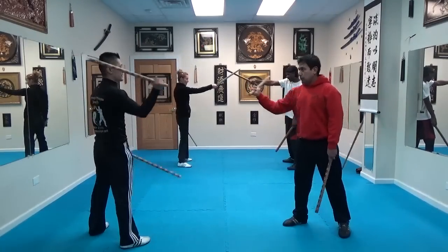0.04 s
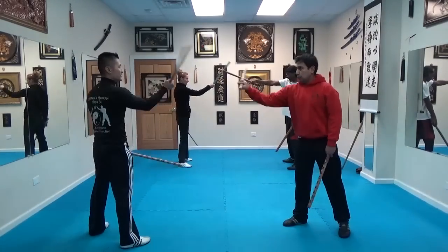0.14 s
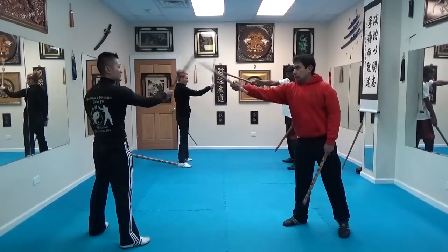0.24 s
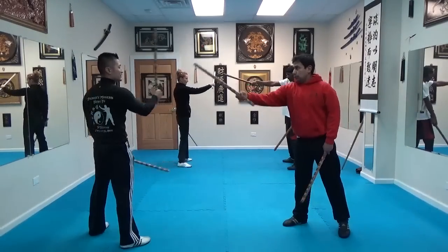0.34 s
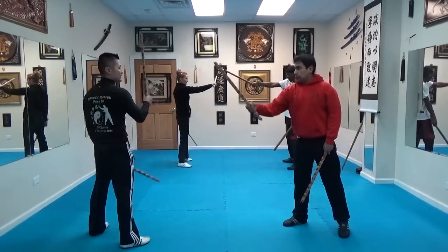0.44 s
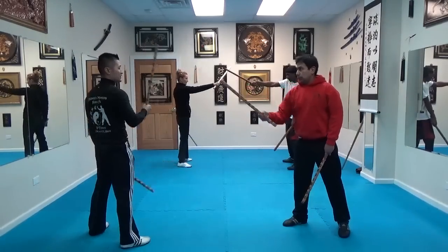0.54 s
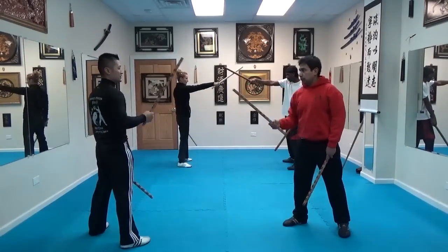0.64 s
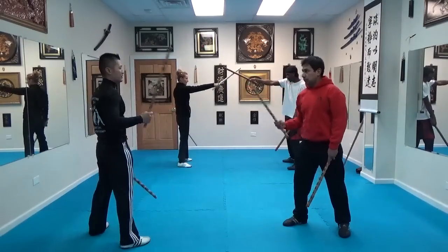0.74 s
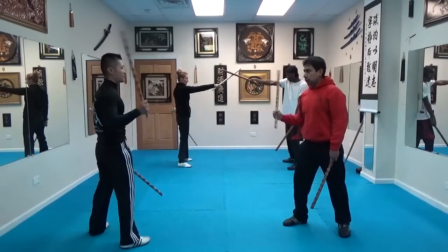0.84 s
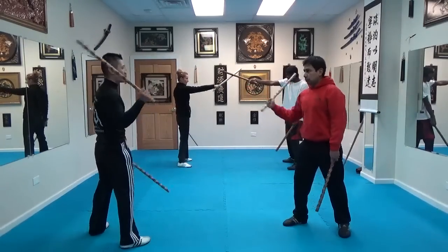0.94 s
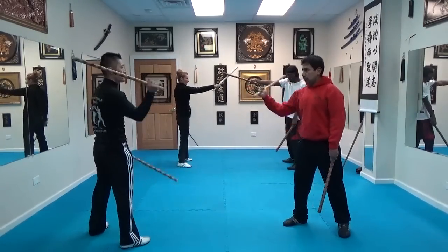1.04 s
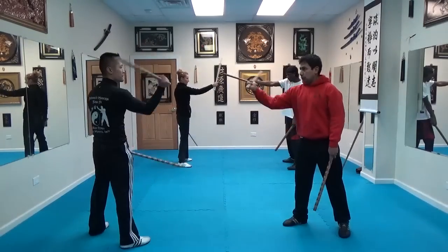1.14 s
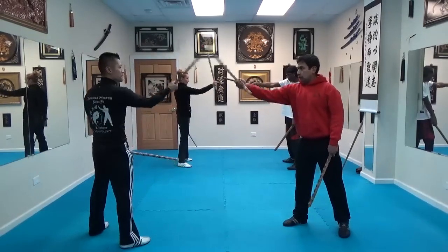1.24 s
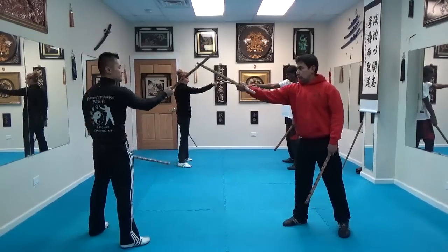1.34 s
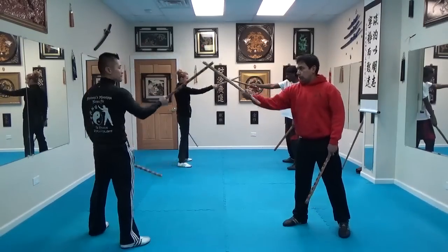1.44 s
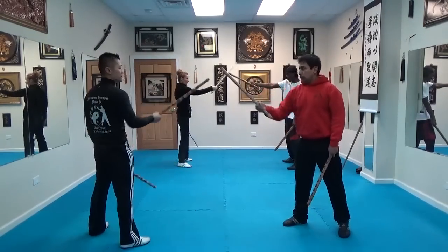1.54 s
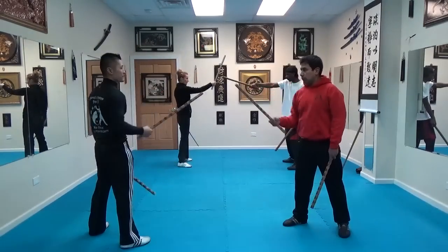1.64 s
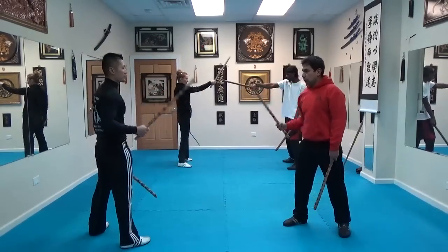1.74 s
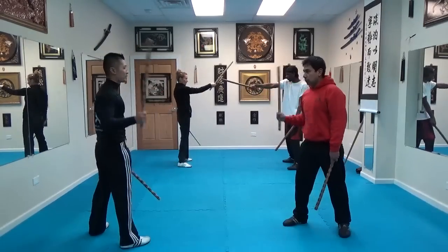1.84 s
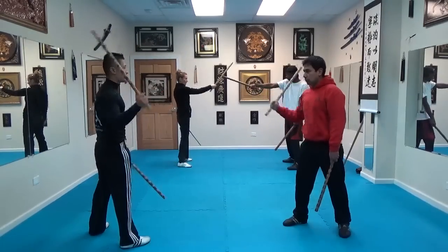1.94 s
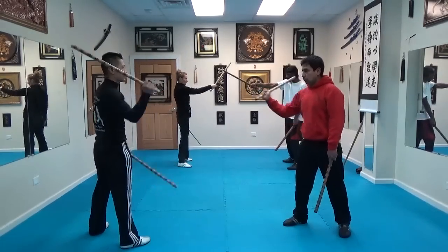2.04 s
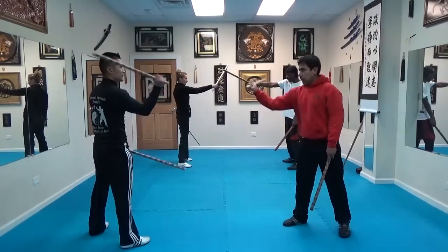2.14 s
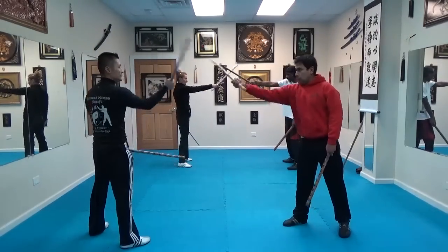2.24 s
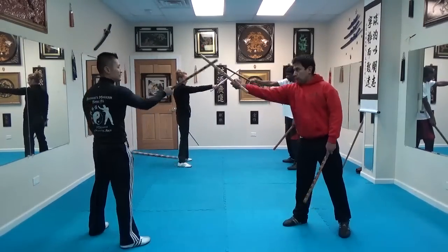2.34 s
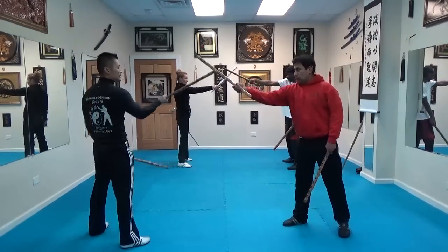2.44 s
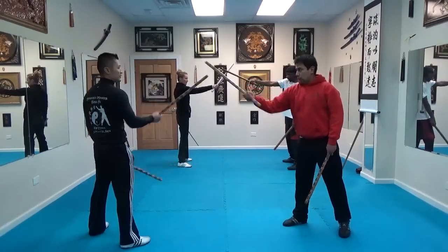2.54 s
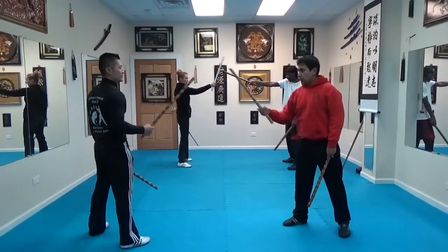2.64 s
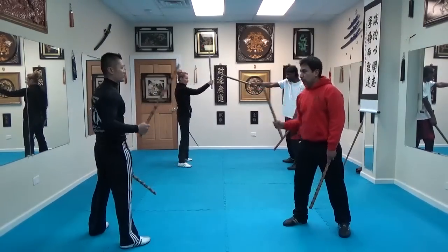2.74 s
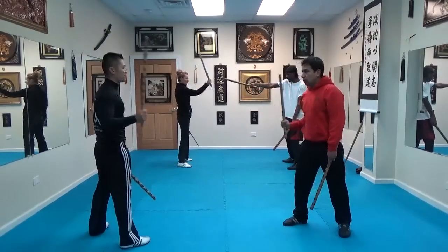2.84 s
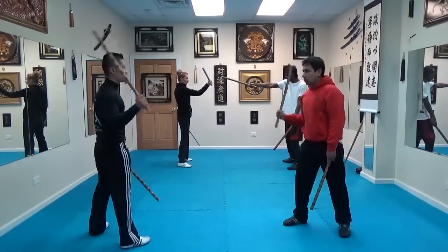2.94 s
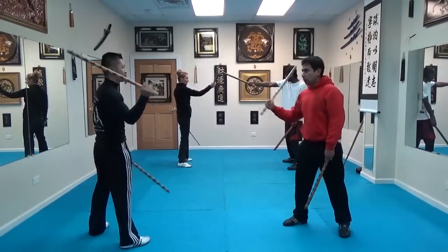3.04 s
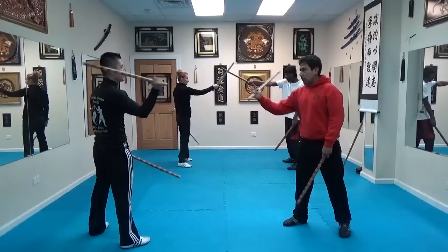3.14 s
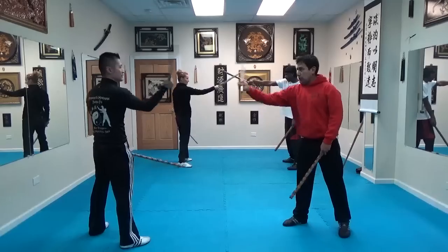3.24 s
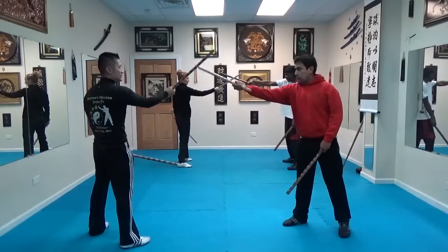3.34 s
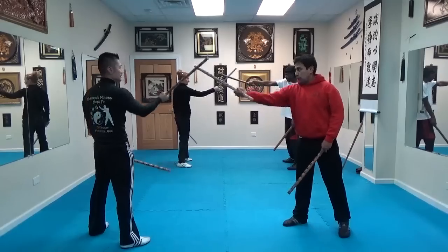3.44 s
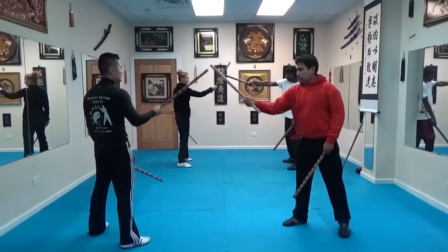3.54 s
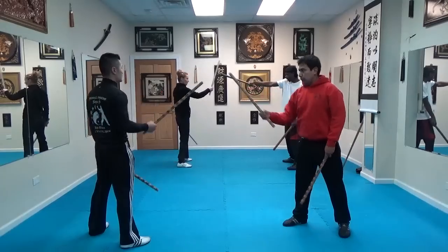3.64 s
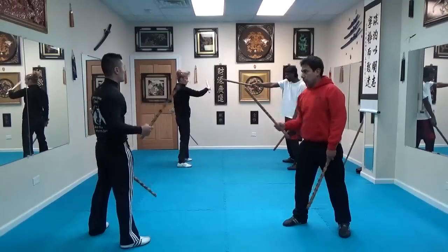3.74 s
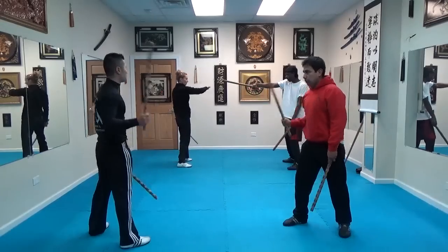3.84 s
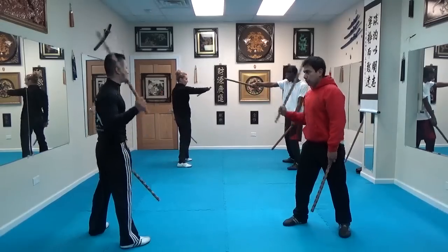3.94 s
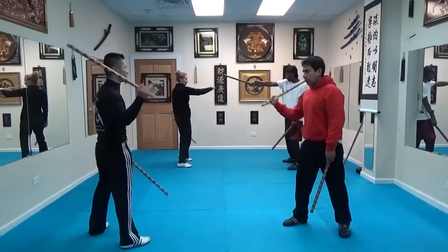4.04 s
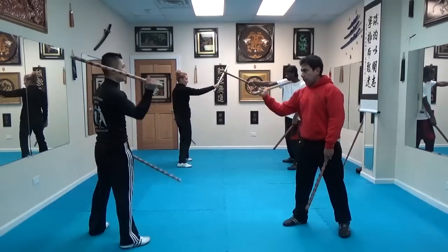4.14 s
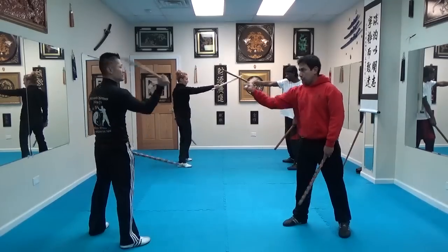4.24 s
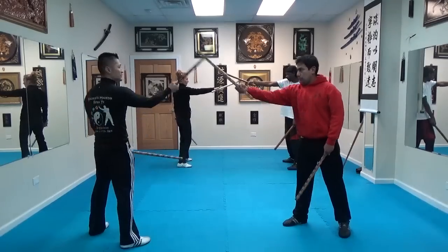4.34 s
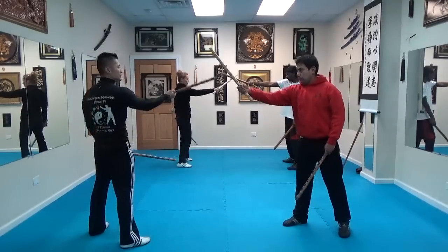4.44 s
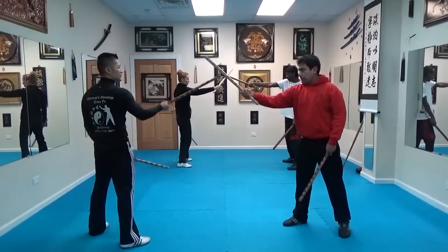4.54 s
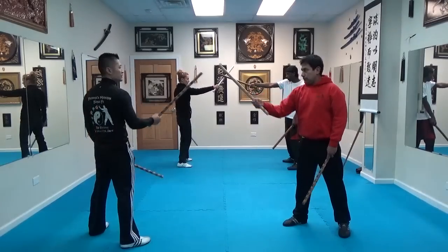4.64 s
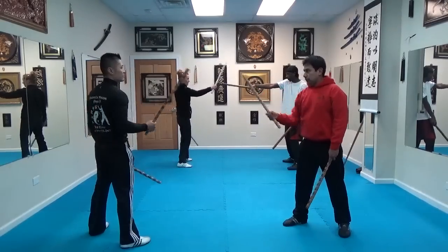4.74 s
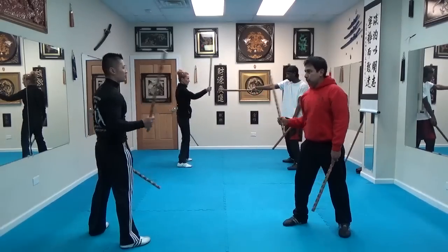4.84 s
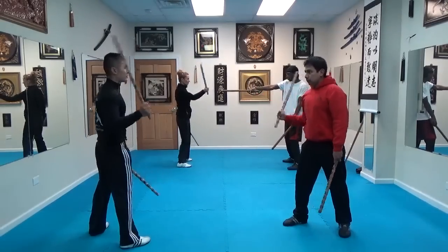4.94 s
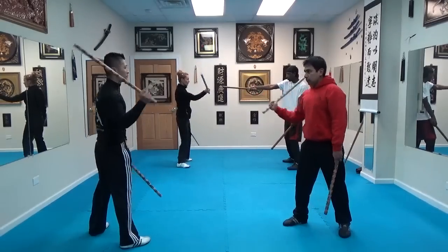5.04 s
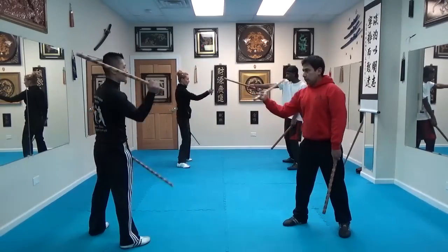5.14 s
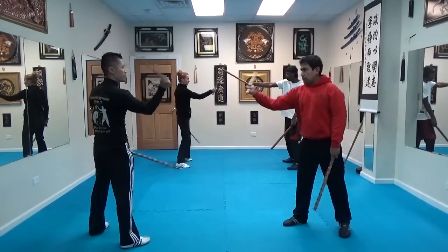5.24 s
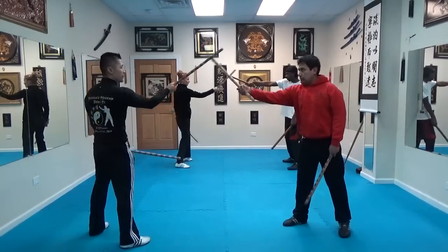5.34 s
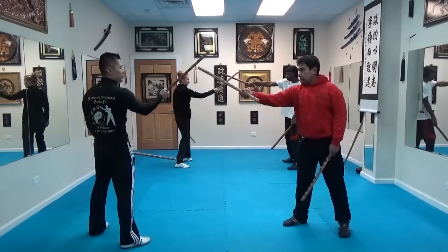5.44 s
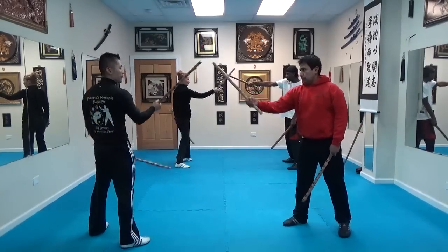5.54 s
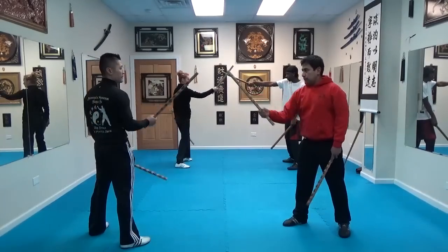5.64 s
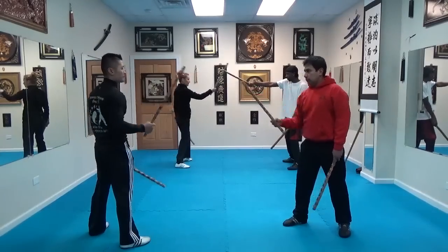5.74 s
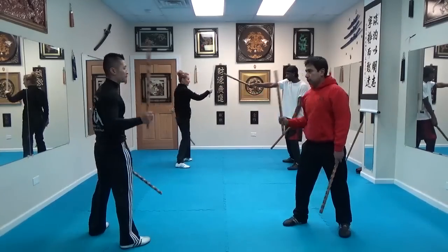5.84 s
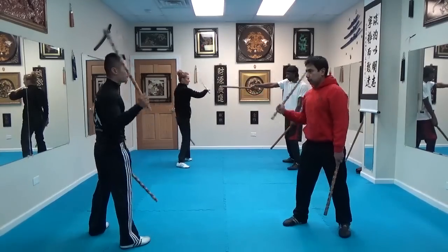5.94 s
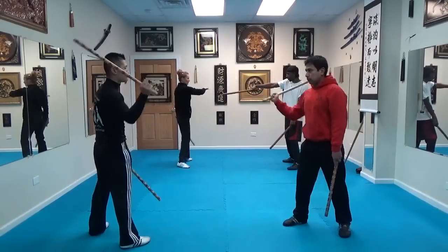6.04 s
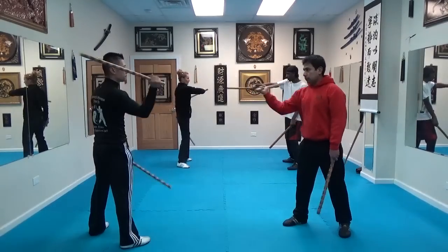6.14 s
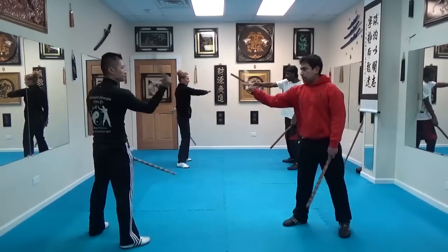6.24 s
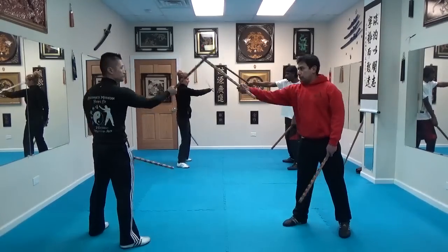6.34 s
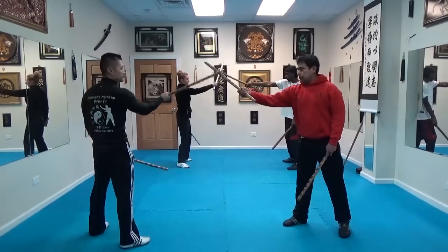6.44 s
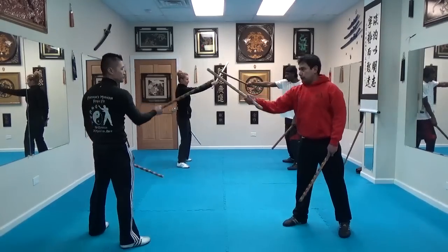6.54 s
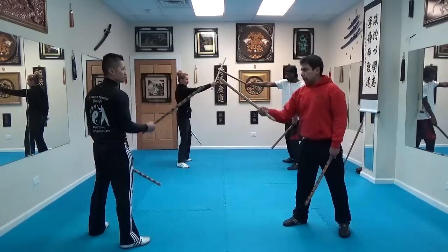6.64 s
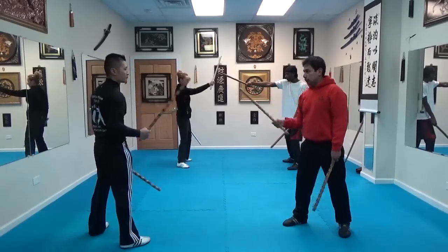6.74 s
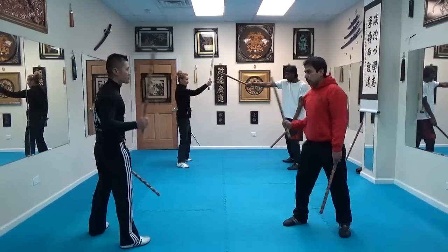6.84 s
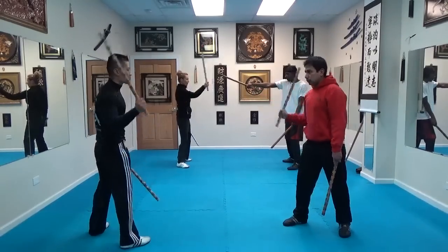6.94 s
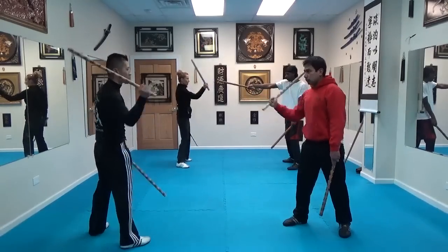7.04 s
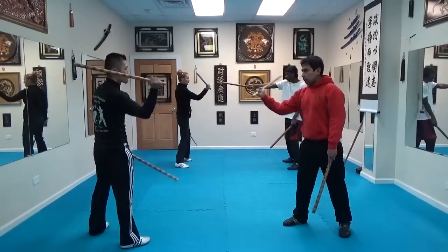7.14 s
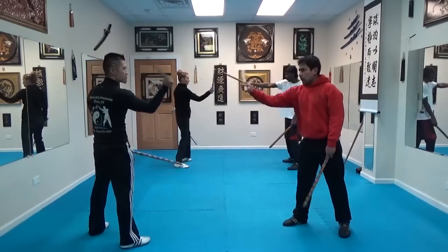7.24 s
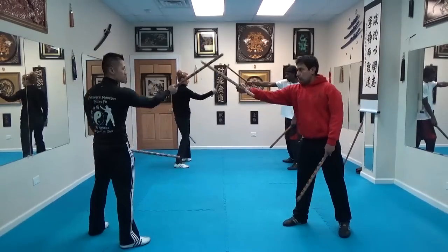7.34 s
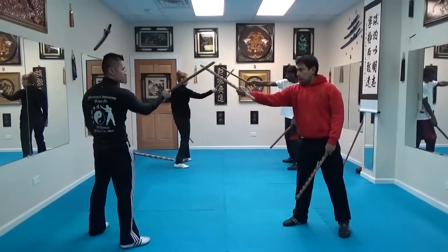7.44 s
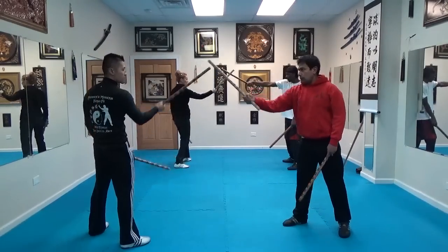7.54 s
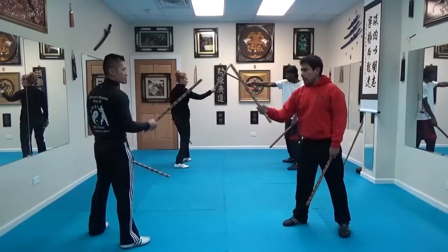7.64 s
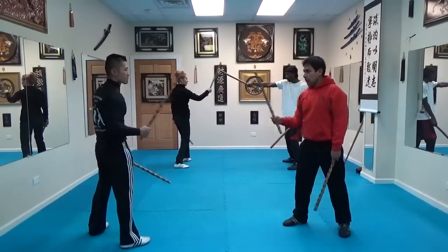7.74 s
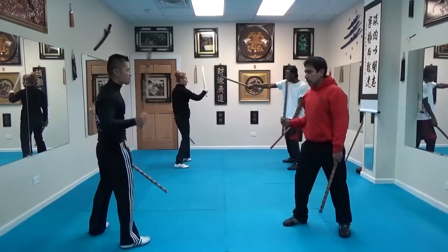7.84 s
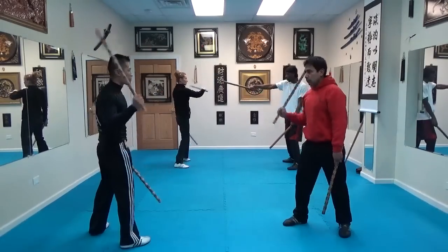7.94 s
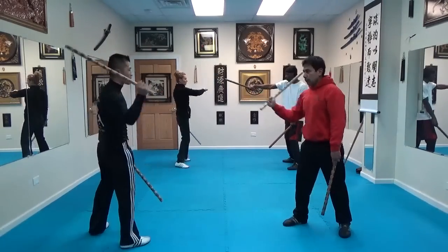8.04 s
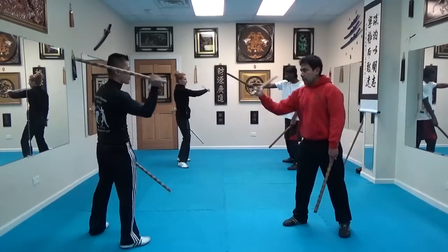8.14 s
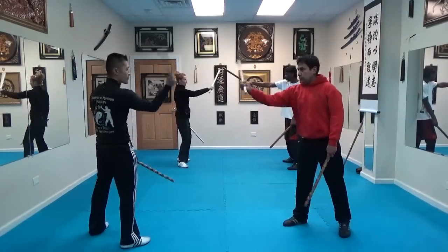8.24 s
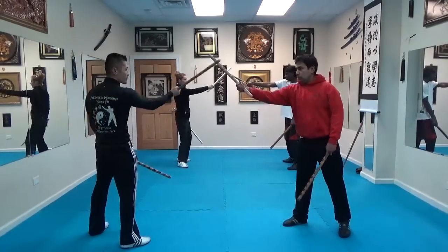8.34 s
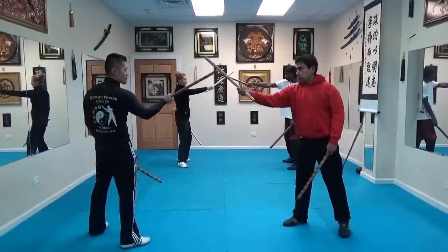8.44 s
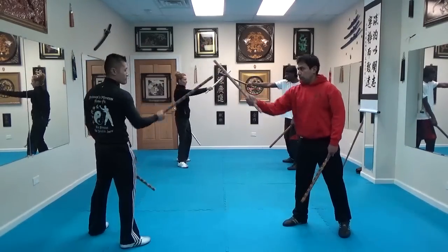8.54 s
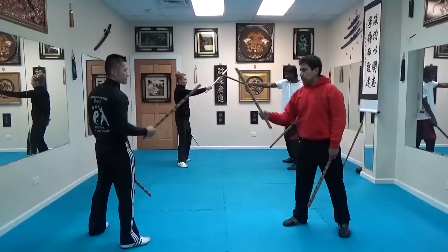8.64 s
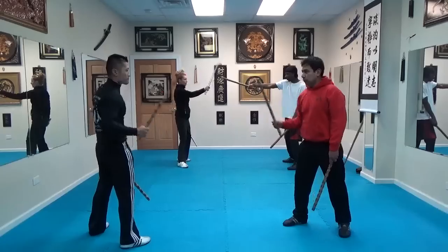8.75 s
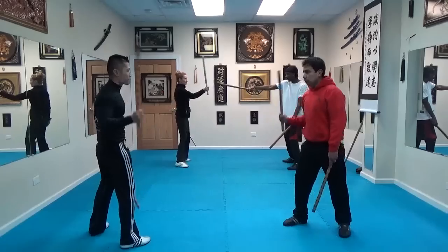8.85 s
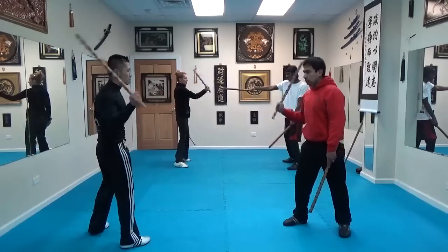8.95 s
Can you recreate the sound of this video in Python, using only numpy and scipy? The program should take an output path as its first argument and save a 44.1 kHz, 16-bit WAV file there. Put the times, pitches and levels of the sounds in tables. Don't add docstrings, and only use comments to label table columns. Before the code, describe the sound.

Nine sharp near stick clacks, each short and dry at first and then drawn out by dense room echo, keep a steady pace of one a second. Farther knocks of wood fill the gaps, drifting against them and finally nearly meeting them. Light cloth rustles and soft mat steps appear in places. The small nearby microphone sounds thin in the bass and squeezes the peaks, keeping the echoes prominent.

```python
import sys
import numpy as np
from scipy import signal
from scipy.fft import rfft, irfft
from scipy.io import wavfile
from scipy.ndimage import uniform_filter1d, minimum_filter1d

SR = 44100
rng = np.random.default_rng(int(sys.argv[2]) if len(sys.argv) > 2 else 0)


def voltage_ratio(decibels):
    exponent = np.asarray(decibels, float) / 20
    return 10 ** exponent


def transcribe(signal):
    frames = np.atleast_2d(signal).T
    limited = np.clip(frames, -1, 1)
    pcm = np.round(limited * 32767).astype(np.int16)
    wavfile.write(sys.argv[1], SR, pcm)


N = 397341


def evened(x):
    return x / np.sqrt(np.mean(x ** 2) + 1e-20)


def read(points, hz):
    f, value = np.transpose(points)
    return np.interp(np.log(hz + 1), np.log(f + 1), value)


def add(mix, s, sound):
    at = round(s * SR)
    sound = sound[:, max(-at, 0):]
    part = mix[:, max(at, 0):][:, :sound.shape[1]]
    part += sound[:, :part.shape[1]]


def coloured(x, points):
    hz = np.fft.rfftfreq(x.shape[-1], 1 / SR)
    return irfft(rfft(x) * voltage_ratio(read(points, hz)), x.shape[-1])


def spread(pair, width):
    side = coloured(pair[1], width)
    return np.array([pair[0] + side, pair[0] - side])


def ring(modes):
    hz, db, t60 = np.transpose(modes)[:, :, None]
    signed = np.fft.fftfreq(16384, 1 / SR)
    f = abs(signed) + 1
    half_width = np.log(1000) / (2 * np.pi * t60)
    resonance = half_width / (half_width ** 2 + ((f ** 2 - hz ** 2) / (2 * f)) ** 2)
    power = voltage_ratio(2 * db) * SR / (2 * np.pi) * resonance
    log_gain = np.log(power.sum(0) + 1e-12) / 2
    lag = np.sign(signed) * (.45 * np.sqrt(f) - 2 * np.pi * .0001 * np.minimum(f, 12000))
    causal = np.conj(signal.hilbert(log_gain))
    return np.fft.ifft(np.exp(causal - 1j * lag)).real[:8192]


# (frequency [Hz], t60 [s])
STUDIO_DECAY = [(250, 0.86), (660, 0.67), (1500, 0.6), (3000, 0.47), (5000, 0.41), (8000, 0.36),
                (11000, 0.36)]
# (frequency [Hz], side minus mid [dB])
ECHO_WIDTH = [(60, -21.5), (500, -10.5), (1200, -6), (3600, -6.5), (6500, -3.5), (11000, -12)]


def studio(walls, tail_db, build_s):
    t = np.arange(SR) / SR
    dense = np.clip(.04 + t / .15, 0, 1)
    taps = rng.standard_normal((2, SR)) * (rng.random((2, SR)) < dense) / np.sqrt(dense)
    hz, frames, z = signal.stft(taps, SR, nperseg=256)
    decay = voltage_ratio(-60 * frames / read(STUDIO_DECAY, hz)[:, None])
    tail = signal.istft(z * decay, SR, nperseg=256)[1][:, :SR]
    tail = spread(tail * (1 - np.exp(-t / build_s)), ECHO_WIDTH)
    answer = voltage_ratio(tail_db) * tail / np.linalg.norm(tail[0])
    answer[:, 0] += 1
    for s, db, side in walls:
        answer[:, round(s * SR)] += voltage_ratio(db) * np.array([1 + side, 1 - side]) * rng.choice([-1, 1])
    return answer


# (frequency [Hz], level [dB])
HUM_TONES = [(178, -78.5), (243, -73)]
# (frequency [Hz], level [dB])
VENTILATION = [(20, -34), (120, 0), (300, -7), (600, -3.5), (1170, -5), (1600, -9), (6400, -17.5),
               (11000, -16)]
# (frequency [Hz], side minus mid [dB])
SOFT_WIDTH = [(60, -16.5), (200, -16), (500, -8), (1200, -5), (6500, -5), (11000, -10.5)]


def air():
    waver = evened(uniform_filter1d(rng.standard_normal((2, len(HUM_TONES), N)), 3000))
    hz, db = np.transpose(HUM_TONES)[:, :, None]
    phase = 2 * np.pi * np.cumsum(hz + 2 * waver[1], axis=1) / SR
    hum = voltage_ratio(db + 3 + 1.5 * waver[0]) * np.sin(phase)
    wash = spread(evened(coloured(rng.standard_normal((2, N)), VENTILATION)), SOFT_WIDTH)
    return voltage_ratio(-63) * wash + hum.sum(0)


# (peak time [s], hiss level [dB], swell [s], body against hiss [dB])
CLOTH_SWEEPS = [(.2, -49.5, 0.13, 3.5), (1.085, -51, 0.025, -21), (1.166, -57.5, 0.14, 4.5),
                (2.676, -57, .12, -11), (3.18, -72.5, 0.14, 9), (5.006, -53, 0.034, -4),
                (5.23, -64, 0.033, 0), (5.3, -61, .15, -7), (5.345, -52.5, 0.09, -2),
                (5.81, -56.5, .12, -1), (6.009, -54, 0.15, -5.5), (6.168, -53, .07, -4),
                (7.12, -65.5, 0.042, 0.5), (7.235, -57, 0.19, -6.5), (7.29, -58, .1, -4),
                (7.9, -62.5, 0.13, -2), (7.998, -61, .2, -4), (8.094, -56.5, .06, -7),
                (8.155, -55.5, .1, -11.5), (8.212, -58.5, 0.14, -7), (8.73, -56.5, 0.056, -7),
                (8.84, -58.5, .05, -3.5), (8.92, -60, 0.13, -6.5), (8.99, -64.5, .1, -5.5)]


def sweeps(level_db, fade_db_per_s):
    s, swell_s = np.transpose(CLOTH_SWEEPS)[[0, 2], :, None]
    t = np.arange(0, N + 64, 64) / SR
    drop_db = np.maximum((s - t) * 19.5 / swell_s, (t - s) * fade_db_per_s)
    gain = np.sqrt(voltage_ratio(2 * (level_db[:, None] - drop_db)).sum(0))
    return np.interp(np.arange(N) / SR, t, gain)


# (frequency [Hz], level [dB])
CLOTH_HISS = [(3000, -33), (5500, -26.5), (7000, -3.5), (9000, -1), (11000, 0)]
# (frequency [Hz], level [dB])
CLOTH_BODY = [(200, -18.5), (600, 0.5), (1500, -1), (3500, -3), (5500, -4.5), (7000, -26.5)]


def rustle():
    hiss_db, body_db = np.transpose(CLOTH_SWEEPS)[[1, 3]]
    clumps = voltage_ratio(1.1 * evened(uniform_filter1d(rng.standard_normal(N), 300)))
    hiss = evened(coloured(rng.standard_normal((2, N)), CLOTH_HISS))
    body = evened(coloured(rng.standard_normal((2, N)), CLOTH_BODY))
    cloth = hiss * sweeps(hiss_db, fade_db_per_s=168)
    cloth = cloth + body * sweeps(hiss_db + body_db, fade_db_per_s=128)
    return spread(cloth * clumps, SOFT_WIDTH)


# (time [s], level [dB], frequency [Hz], t60 [s])
MAT_STEPS = [
    (1.16, -47.5, 555, 0.088),
    (2.724, -51.5, 334, 0.15),
    (3.722, -53.5, 384, 0.11),
    (4.751, -54, 262, 0.085),
    (7.109, -56, 614, 0.053),
    (8.205, -60.5, 474, 0.13),
]
# (delay [s], level against direct [dB], side share [1])
FAR_WALLS = [(.0022, -2, .1), (.005, -4, .3), (.0085, -4, -.3), (.014, -4, .2), (.021, -5, -.3),
             (.03, -5, .2)]


def steps():
    out, t = np.zeros((2, N)), np.arange(SR) / SR
    for s, db, hz, t60 in MAT_STEPS:
        pat = ring([(hz, db, t60 / 10), (2 * hz, db - 7, t60 / 10)])
        room = studio(FAR_WALLS, tail_db=35, build_s=.0204) * voltage_ratio(-30 * t / t60)
        add(out, s, signal.fftconvolve(pat[None], room, axes=1))
    return out


# (frequency [Hz], level [dB], t60 [s])
KNOCK_MODES = [(328, -22, 0.12), (400, -21.5, 0.024), (657, -2.5, 0.026), (846, -3.5, 0.018)]


def blow(modes, centre, knock_db, tick_db, sings_hz, sings_db):
    detune = 1 + .012 * rng.standard_normal((2, 16))
    centre_hz, fall_below, fall_above = centre

    def away(hz):
        fall = max(fall_below * np.log2(centre_hz / hz), fall_above * np.log2(hz / centre_hz))
        return fall - .3 * knock_db * max(np.log2(2330 / hz), 0)

    clack = [(hz * d, db - away(hz), t60) for (hz, db, t60), d in zip(modes, detune[0])]
    knock = [(hz * d, db + knock_db, t60) for (hz, db, t60), d in zip(KNOCK_MODES, detune[1])]
    deep = (246, -6.5 + 3.5 * knock_db, .15)
    singing = (sings_hz, sings_db, .033)
    tick = (8100, tick_db, .0005)
    return ring(clack + knock + [deep, singing, tick])


def sticks(blows, modes, centre, sings_db, walls, tail_db, build_s):
    out = np.zeros((2, N))
    for s, db, *touch in blows:
        wood = blow(modes, centre, *touch, sings_db)
        heard = signal.fftconvolve(wood[None], studio(walls, tail_db, build_s), axes=1)
        add(out, s, voltage_ratio(db) * heard)
    return out


# (time [s], level [dB], knock of low modes [dB], tick [dB], mode that sings out [Hz])
FAR_BLOWS = [(-.22, 11.5, -3.5, -2, 1520), (.652, 11, -2, -1.5, 1476), (1.596, 8.5, -7, -3.5, 1216),
             (2.270, 8.5, -2.5, -0.5, 1140), (3.197, 12.5, -2, 1.5, 1960), (4.217, 9.5, -1.5, 0, 1990),
             (4.318, 2, -15, -3, 1170), (5.350, 4, 0, 3, 1190), (6.506, 5.5, -0.5, 3.5, 787),
             (6.632, 3, -4, -3.5, 1570), (7.424, 3, -0.5, 4.5, 840), (7.513, 0, -5.5, -2, 1580)]
# (frequency [Hz], level [dB], t60 [s])
FAR_MODES = [(1180, 1.5, 0.017), (1420, 2, 0.0099), (1944, 0, 0.0088), (2410, -1, .012), (2800, 2.5, 0.013),
             (3240, 1.5, .011), (3680, 2, .011), (4100, 2.5, .011), (4800, 0.5, 0.0053), (5070, 1, 0.0067)]


def far_pair():
    return sticks(FAR_BLOWS, FAR_MODES, centre=(1900, 6, 8.8), sings_db=-.5,
                  walls=FAR_WALLS, tail_db=13, build_s=.004)


# (time [s], level [dB], knock of low modes [dB], tick [dB], mode that sings out [Hz])
NEAR_BLOWS = [
    (.2615, 16.5, -22.5, -21, 3827),
    (1.309, 18.5, -17, -22, 1750),
    (2.336, 16.5, -13, -33, 4630),
    (3.361, 18, -17, -20, 3080),
    (4.403, 15.5, -15.5, -18.5, 1171),
    (5.397, 18.5, -12.5, -7.5, 2447),
    (6.380, 21.5, -20, -23, 4800),
    (7.384, 18.5, -15.5, -6, 1544),
    (8.366, 16.5, -7.5, -6, 1540),
]
# (frequency [Hz], level [dB], t60 [s])
NEAR_MODES = [(1170, 3, 0.014), (1707, 2.5, 0.02), (1940, -0.5, 0.0092), (2313, -0.5, 0.01),
              (2630, -2.5, .016), (3057, 3, 0.011), (3430, -1, 0.012), (3855, 1.5, 0.0093), (4270, 0, .01),
              (4773, 1.5, 0.0084), (5500, -1.5, 0.0076)]
# (delay [s], level against direct [dB], side share [1])
NEAR_WALLS = [(.0035, -3, .1), (.0055, -4, -.3), (.008, -7, .3), (.011, -3, .4), (.0135, -7, -.4),
              (.017, -6, .2), (.021, -7, -.3), (.026, -5, .3), (.029, -6, -.2)]


def near_pair():
    return sticks(NEAR_BLOWS, NEAR_MODES, centre=(2810, 6.2, 8.56), sings_db=-3.5,
                  walls=NEAR_WALLS, tail_db=12.5, build_s=.009)


# (frequency [Hz], level [dB])
MICROPHONE = [(100, -48.5), (300, -20.5), (600, -11.5), (4500, -7), (5600, -9), (6400, -13.5), (7200, -8.5),
              (10000, -5)]


def scene():
    background = air() + rustle() + steps()
    return background + coloured(far_pair() + near_pair(), MICROPHONE)


def roll_off(x):
    return signal.sosfilt(signal.butter(12, 12360, fs=SR, output="sos"), x)


def record(dry):
    peak_db = 20 * np.log10(abs(dry).max(0) + 1e-9)
    ahead_db = -minimum_filter1d(-peak_db, size=71)
    fall = np.arange(N) * 900. / SR
    over_db = np.maximum(np.maximum.accumulate(ahead_db + fall) - fall + 7, 0)
    held = dry / voltage_ratio(.93 * uniform_filter1d(over_db, size=131))
    held = 1.5 * np.tanh(held / 1.5) + .025 * held ** 2
    held = spread([held.mean(0), (held[0] - held[1]) / 2], [(40, -17), (250, -1.5)])
    edge = signal.firwin(301, 11060, window=("kaiser", 6), fs=SR)
    mix = signal.oaconvolve(held, edge[None], "same")
    return roll_off(mix)


dry = scene()
out = record(dry)
transcribe(out)
```